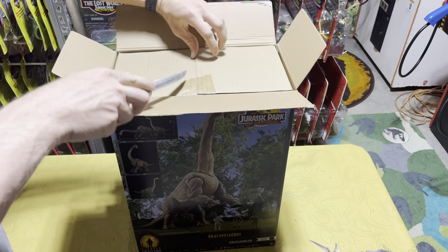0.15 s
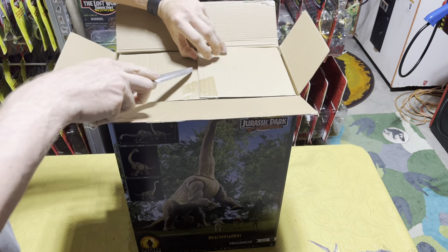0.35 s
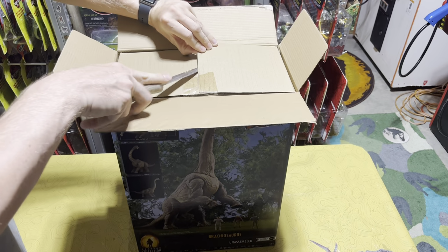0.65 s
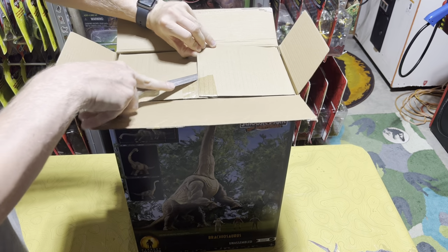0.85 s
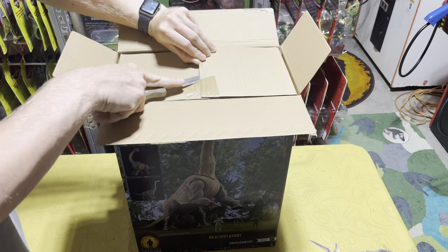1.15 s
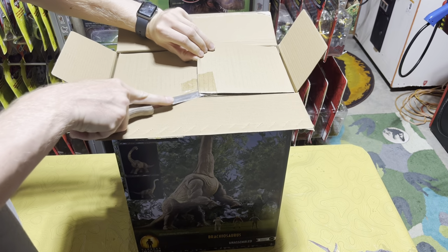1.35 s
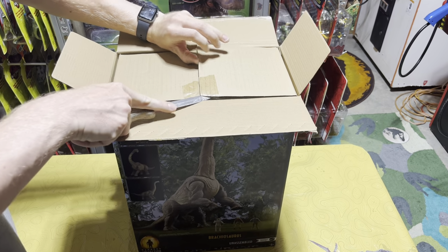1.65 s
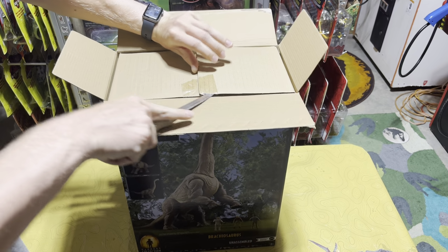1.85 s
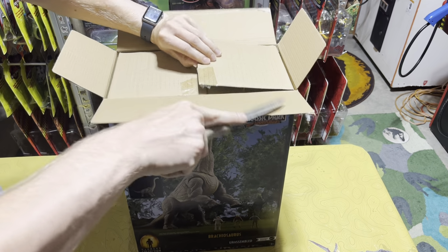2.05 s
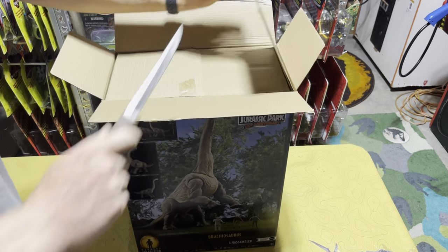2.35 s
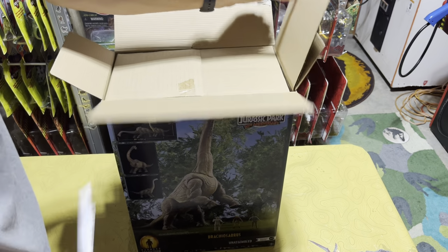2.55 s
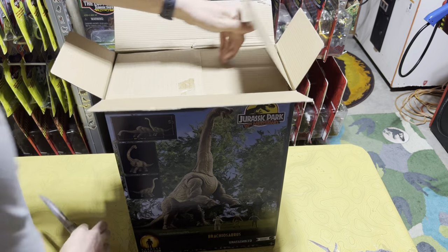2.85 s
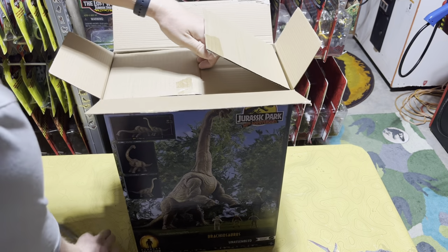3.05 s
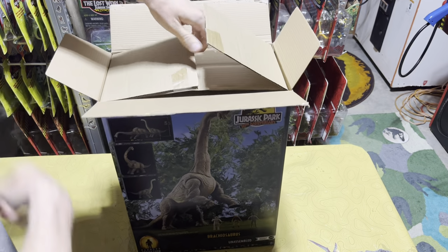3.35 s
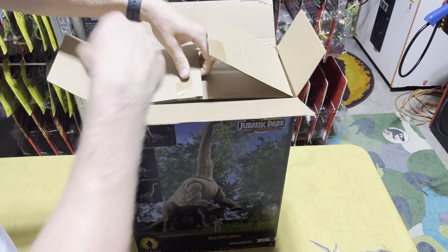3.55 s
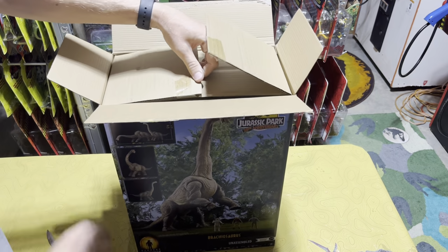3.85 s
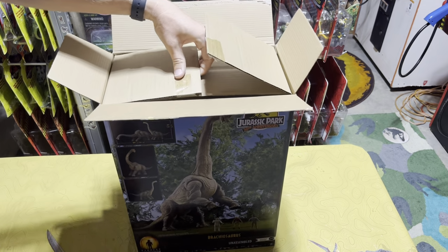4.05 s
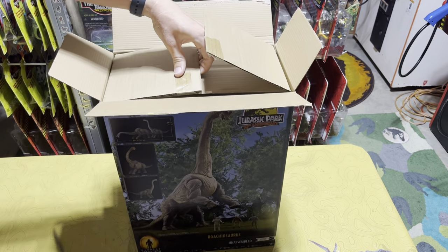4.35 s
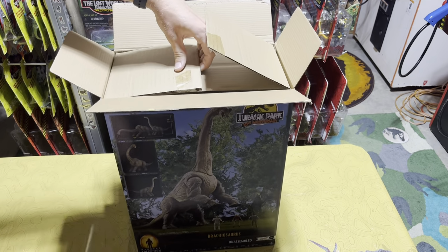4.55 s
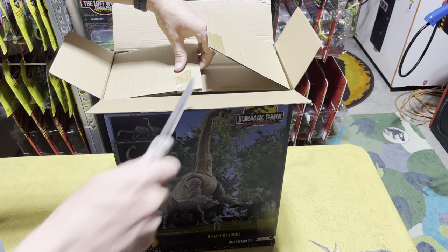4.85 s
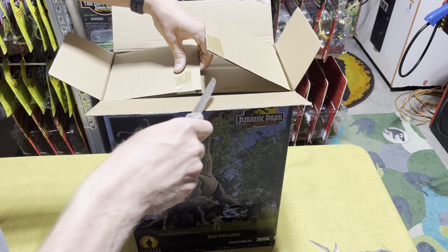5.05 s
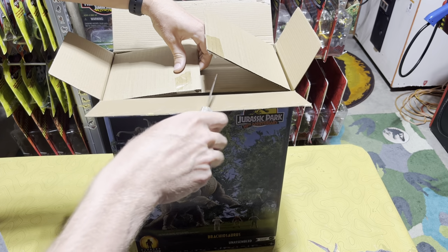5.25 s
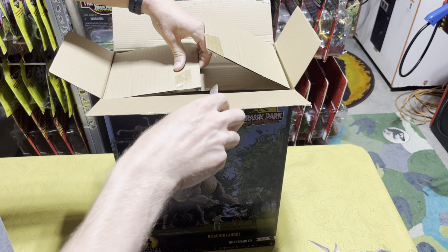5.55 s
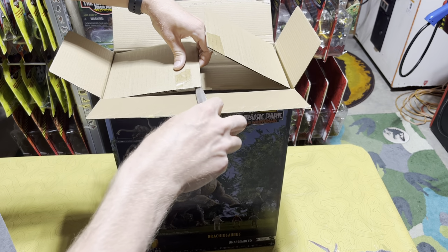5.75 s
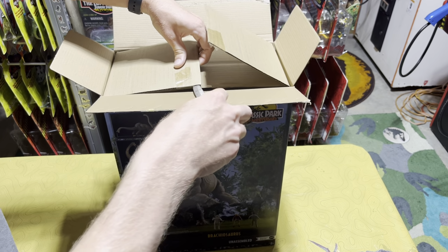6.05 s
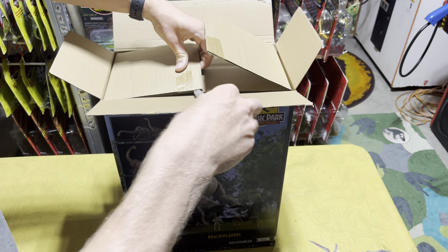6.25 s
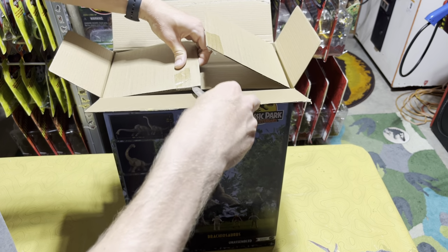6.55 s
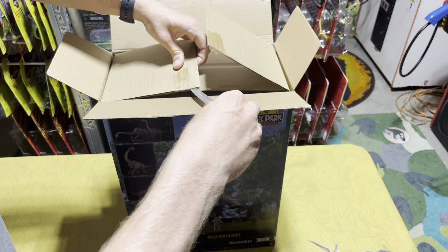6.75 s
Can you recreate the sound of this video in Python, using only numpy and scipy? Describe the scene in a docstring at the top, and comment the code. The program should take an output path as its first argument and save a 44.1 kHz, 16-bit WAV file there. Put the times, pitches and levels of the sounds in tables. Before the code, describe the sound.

A knife scrapes and saws at a cardboard box up close, flaps knock and boom hollowly, then one sharp bright click and quieter scratching.

```python
"""In a small, crowded room a cardboard box is opened on a cloth-covered table, close to two microphone ports.
Sliding hands and a blade are friction noise and scattered snaps; juddering, sawing and squealing
edges are stick-slip oscillators. Flaps knock as dispersed bending waves, the hollow box rings in damped
modes, and parting bonds, among them a sharply clicking inner flap, are short bursts of bright noise.
Diffuse echoes of the blows and faint still air lie behind them."""
import sys
import numpy as np
from scipy import signal
from scipy.fft import rfft, irfft, next_fast_len
from scipy.io import wavfile

SR = 44100
rng = np.random.default_rng(int(sys.argv[2]) if len(sys.argv) > 2 else 0)


def digitize_waveform(pressure):
    """Quantize a signal to 16-bit integers and store it at the path in sys.argv[1].

    Rows of a 2-D input are taken as channels; values are limited to [-1, 1].
    """
    field = np.atleast_2d(pressure).T
    bounded = np.clip(field, -1, 1)
    quanta = np.round(bounded * 32767).astype(np.int16)
    wavfile.write(sys.argv[1], SR, quanta)


N = 304290
TIME = np.arange(N) / SR
AGE = np.arange(SR // 4) / SR  # time since a blow, s
SIZE = next_fast_len(N + SR // 3)
BINS = np.maximum(np.fft.rfftfreq(SIZE, 1 / SR), 1)  # Hz
PORT_SIGNS = np.array([[1], [-1]])  # left, right
BAND_TOP_HZ = 0.45 * SR

# Still room: f/Hz, spectral shape/dB per Hz
AIR_SPECTRUM = [(15, -39.5), (30, 1.5), (65, 2), (140, -17), (500, -21.5), (900, -34.5), (6000, -47),
                (13500, -43.5), (15000, -61)]
# Reverberation: f/Hz, t60/s
ROOM_T60 = [(100, 0.25), (700, 0.087), (4000, 0.25), (13000, 0.094)]
# Likeness of the two ports: f/Hz, correlation
LIKENESS = [(60, 0.97), (250, 0.96), (700, 0.37), (2000, 0.93), (5000, 0.57), (12000, 0.93)]
# Level difference of the ports: f/Hz, left minus right level/dB
BALANCE = [(60, 1.5), (250, 1.5), (700, 4.5), (1100, 3), (2000, 0), (4400, 5), (9000, 0)]
# Diffraction round the recorder: f/Hz, lead of the left port/rad (negative: lag)
PORT_PHASE = [(100, 0), (600, 0.14), (950, 0.5), (1640, 0.91), (3270, 0.98), (5080, 0.9), (7000, -1.83),
              (11100, -5.5), (14500, -8.5)]

# Restless hands holding the box: t/s, level/dB ahead of the shares below
FIDGET = [(0.0, -61), (2.0, -68), (2.7, -73.5), (4.3, -69.5), (5.1, -83), (6.9, -76)]
FIDGET_FLEX_DB, FIDGET_DRUM_DB, FIDGET_RASP_DB, FIDGET_HISS_DB = -6.5, -1.5, -8.5, -5.5
# Palm brushing the board: start t/s, swell/s, fade/s, relative level/dB
SWIPES = [(0.74, 0.1, 0.14, -60), (1.635, 0.036, 0.54, -57.5), (2.02, 0.14, 0.13, -52),
          (2.19, 0.098, 0.068, -47.5), (2.356, 0.11, 0.22, -55), (2.686, 0.037, 0.11, -56.5),
          (3.0, 0.11, 0.091, -55.5), (4.25, 0.2, 0.41, -63.5), (5.225, 0.012, 0.011, -60),
          (5.602, 0.087, 0.016, -52), (6.268, 0.062, 0.046, -58)]
PALM_RASP_DB = -18.5  # soft skin hardly rasps
# Blade or flap edge dragged over the board: start t/s, swell/s, fade/s, relative level/dB,
# weight on the wall/dB, sharpness of the edge/dB
SCRAPES = [(0.231, 0.017, 0.067, -46.5, -29, -11), (0.318, 0.005, 0.2, -54.5, -3, -9),
           (0.458, 0.044, 0.1, -48.5, -9, -3.5), (0.547, 0.02, 0.035, -40, -26, 0),
           (0.588, 0.027, 0.055, -48, -6, -21), (0.651, 0.05, 0.05, -49.5, -4, 3.5),
           (0.844, 0.052, 0.12, -45, -19, 1), (0.958, 0.068, 0.022, -47, -19, -2),
           (1.061, 0.064, 0.061, -49.5, 0.5, -3.5), (1.15, 0.089, 0.072, -41.5, -4, 6),
           (1.256, 0.041, 0.023, -39, -3.5, -6.5), (1.326, 0.042, 0.032, -51, 1.5, 5.5),
           (1.649, 0.074, 0.08, -45.5, -5.5, -4.5), (1.768, 0.0099, 0.25, -49, -3, -3.5),
           (1.883, 0.053, 0.037, -29, -7, -4), (1.995, 0.024, 0.033, -40.5, -11, -3.5),
           (2.445, 0.063, 0.056, -44.5, 0.5, -2), (2.803, 0.01, 0.16, -40.5, -10, 0),
           (2.901, 0.061, 0.024, -41.5, -5, 2.5), (3.05, 0.2, 0.16, -52, 11.5, 1.5),
           (3.446, 0.041, 0.091, -40.5, 2, -0.5), (3.605, 0.016, 0.093, -70, 16, 23.5),
           (3.751, 0.028, 0.13, -46, -16, -6), (3.86, 0.028, 0.099, -51.5, -3.5, -3.5),
           (3.989, 0.016, 0.18, -55.5, -24, -3.5), (4.071, 0.04, 0.12, -65, -20, 10.5),
           (4.446, 0.016, 0.11, -59, -2.5, 3), (5.245, 0.042, 0.15, -57, -3, -6.5),
           (5.447, 0.0085, 0.83, -62, 3, -0.5), (5.556, 0.13, 0.034, -48.5, -9, -2.5),
           (5.757, 0.013, 0.0096, -48.5, -28, -5.5), (5.873, 0.046, 0.05, -53.5, -6, -11),
           (6.074, 0.069, 0.025, -46.5, -6.5, -5.5), (6.249, 0.051, 0.079, -53, 5.5, -4),
           (6.44, 0.041, 0.067, -65.5, 9, -12), (6.535, 0.061, 0.067, -52.5, 0.5, -8.5),
           (6.643, 0.063, 0.044, -39, 1.5, -1.5), (6.78, 0.015, 0.17, -45.5, -7.5, -8),
           (6.855, 0.29, .012, -48, -17.5, 12)]
# Treble of a scrape against its drumming; the hiss grows with the sharpness of the edge
RASP_DB, HISS_DB, HISS_PER_SHARPNESS = -5.5, -7, 1.3
# Every stroke bites, swells to its crest, fades by as much and dies away
BITE_S, SWELL_DB, RELEASE_DB_PER_S = 0.0092, 14, 261.5
# Colours of sliding contact, from flexing walls to surface hiss: f/Hz, spectral shape/dB per Hz
FLEX_SPECTRUM = [(18, -40.5), (40, -10), (60, 4), (140, 4.5), (200, -3.5), (280, -43)]
DRUM_SPECTRUM = [(130, -22), (210, 4), (320, 2), (430, -1.5), (640, -5.5), (880, -11.5), (1250, -37)]
RASP_SPECTRUM = [(620, -29.5), (950, 4), (1300, -8), (1800, -8.5), (2600, -11.5), (4800, -7.5), (6800, -24)]
HISS_SPECTRUM = [(3600, -6.5), (5200, -7), (7000, -1), (9500, -0.5), (12000, 0), (13800, -3), (14700, -13),
                 (16000, -33)]
# Resonances of the corrugated board: f/Hz, width/Hz, level/dB
BOARD = [(650.6, 38, -2), (990, 60, -2.5), (1410, 23, -2), (1860, 130, 3.5), (2250, 270, -3.5),
         (3070, 130, -10.5)]

# Edge juddering along the board: start t/s, end t/s, first f/Hz, last f/Hz, slips per s,
# relative level/dB, overtone level/dB, pitch scatter (share)
JUDDERS = [(0.0, 0.143, 375, 334.5, 280, -62, 5.5, 0.25), (0.237, 0.261, 382, 361, 180, -53, 4.5, 0.15),
           (2.932, 2.98, 266, 288, 125, -40.5, -8, 0.13),
           (4.074, 4.131, 364, 336.4, 165, -47.5, -0.5, 0.15),
           (5.233, 5.252, 337.5, 312, 330, -62, 9, 0.058),
           (5.273, 5.356, 321.4, 302, 260, -56.5, 0.5, 0.0885),
           (5.458, 5.519, 224, 219, 72, -51, -12.5, 0.023), (6.778, 6.793, 383, 343, 300, -54, 2.5, 0.085),
           (6.801, 6.833, 322, 288, 137, -46.5, -7, 0.064)]
# Modes of a juddering flap: multiple of the fundamental, level/dB, t60/s
FLAP_MODES = [(1, -2, 0.131), (3.03, -4.5, 0.13), (4.35, -19, 0.13), (5.55, -10.5, 0.095),
              (7.9, -17, 0.085), (11.6, -18, 0.036)]
# Blade sawing in the slit: start t/s, swell/s, fade/s, level/dB, pitch (multiple of the blade modes),
# unevenness of the slips (0-1)
SAWS = [(0.484, 0.029, 0.015, -48, 1.0, .15), (0.553, 0.019, 0.013, -46.5, 1.0, 0.31),
        (1.19, 0.078, 0.037, -47, 1.35, .4), (1.897, 0.043, 0.028, -37.5, 1.5, 0.32),
        (5.444, 0.0075, 0.048, -58.5, 1.0, 0.2), (5.5, 0.068, 0.075, -58.5, 1.0, .08),
        (5.63, 0.06, 0.031, -50.5, 1.0, .06), (6.088, 0.05, 0.0093, -58, 0.93, 0.12),
        (6.262, 0.074, 0.026, -62, 1.0, 0.2), (6.655, 0.063, 0.036, -49, 0.97, 0.08)]
# Blade gripped by the board, at pitch 1: f/Hz, width/Hz, level/dB
BLADE = [(680, 320, -1.5), (957, 200, -5.5), (1230, 78, -9), (1800, 250, -6), (2230, 200, -6.5),
         (3920, 440, -20)]
# Edge slipping in step with the panel: start t/s, end t/s, first f/Hz, last f/Hz, relative level/dB
SQUEAKS = [(0.43, 0.512, 542, 627, -48.5), (0.495, 0.594, 608.6, 477, -46), (2.855, 2.91, 618, 554, -38)]

# Stiff flaps springing back: t/s, relative level/dB
BOOMS = [(1.794, -36.5), (1.897, -38.5), (2.4594, -26.5), (2.4733, -25), (2.496, -25.5), (3.18, -31)]
# Modes of the hollow box: f/Hz, level/dB, t60/s
BOX_MODES = [(308.3, 2.5, 0.11), (320, -7.5, 0.08), (650, -17, 0.06), (990, -15.5, 0.079),
             (1600, -23.5, 0.07)]
# Blade tip pricking the tape: t/s, relative snap level/dB, clink of steel level/dB
TICKS = [(0.083, -42.5, -42.5), (0.2783, -43.5, -39.5), (0.319, -44.5, -36.5), (0.382, -42.5, -41),
         (0.401, -43, -42), (0.574, -38.5, -36), (1.03, -43.5, -48.5), (1.09, -46, -50),
         (1.157, -31.5, -24), (1.172, -33, -43), (1.217, -36, -31.5), (1.351, -37.5, -54),
         (1.4147, -39, -68), (1.64, -47, -50), (1.911, -30, -35), (1.941, -36.5, -30.5),
         (3.457, -52.5, -64), (3.5185, -29.5, -44), (4.4563, -45, -73), (5.7693, -68, -49.5),
         (6.6206, -46, -74), (6.7026, -35, -40)]
# Tape or a glued edge ripping free: t/s, level/dB
RIPS = [(2.134, -21.5), (2.495, -29), (3.051, -34), (3.2597, -12.5), (3.6326, -22.5), (6.7028, -27.5)]
RIP_T60_S, RIP_TAIL_DB, RIP_TAIL_T60_S = 0.014, -21.5, 0.086
# Flaps and blade striking or slipping off an edge: t/s, relative crack level/dB, clap level/dB,
# panel level/dB, panel f/Hz, thud level/dB, thud f/Hz
KNOCKS = [(0.414, -46, -57, -40.5, 398, -45, 204), (0.6654, -35.5, -36.5, -50, 330, -45, 195),
          (0.9147, -63, -45.5, -39, 450, -46.5, 93), (1.1136, -33.5, -37.5, -39.5, 284, -69, 148),
          (1.1559, -22, -47.5, -32.5, 407, -41.5, 143), (1.7904, -50, -36, -40, 367, -53.5, 101),
          (1.8914, -17.5, -19, -30.5, 381.5, -32.5, 140), (1.996, -34, -28.5, -42, 600, -49, 215),
          (2.1343, -27.5, -48.5, -44, 254, -38, 117), (2.455, -38, -30, -35.5, 293, -44, 204),
          (2.492, -31, -33, -42, 294, -29, 97), (2.8075, -56, -39, -34.5, 422, -58, 188),
          (2.8504, -43, -39, -29.5, 533, -63, 204), (2.905, -54.5, -48, -36.5, 414, -38, 194),
          (3.05, -50, -38, -40, 235, -39.5, 160), (3.1097, -44.5, -45, -34.5, 179.5, -38, 155),
          (3.1779, -29, -34.5, -25, 165, -19, 119), (3.2607, -16.5, -23, -27, 180, -27.5, 175),
          (3.2622, -24, -18, -38, 180, -37, 121.4), (3.6293, -31.5, -33, -32.5, 209.6, -49, 129),
          (3.75, -57, -65, -45.5, 530, -50, 142), (3.88, -42.5, -51.5, -41, 283, -58, 188),
          (4.074, -45, -69, -45.5, 570, -63, 86), (5.576, -46, -41, -43.5, 330, -43, 210),
          (6.7014, -29, -49, -38, 298, -37.5, 132), (6.798, -49.5, -47, -40, 640, -46, 213)]
FIBRE_DB = -6.5  # surface fibres crushed by a knock, against its crack
# The corrugation rings higher where the panel is stiffer
FLUTE_HZ, FLUTE_PANEL_HZ, FLUTE_FOLLOWS = 1060, 180, .3
# Bending-wave chirp: pitch is cycles over age, strength a bell round the panel's pitch
BEND_CYCLES, BEND_LEAD_S, BEND_OCTAVES = 2.286, 0.0007106, 0.84


def from_db(db):
    """Definition of level: an amplitude gain is the exponential of its decibels."""
    return np.exp(np.asarray(db) * (np.log(10) / 20))


def rms_one(x):
    """Normalisation: divide by the root of the mean power."""
    return x / np.sqrt(np.mean(x ** 2) + 1e-20)


def at_hz(points, hz):
    """Interpolation on a logarithmic frequency axis, the scale of pitch."""
    f, value = np.transpose(points)
    return np.interp(np.log(hz), np.log(f), value)


def band(x, low_hz, high_hz):
    """Causal band-pass filtering: only frequencies between two edges remain strong."""
    return signal.sosfilt(signal.butter(2, [low_hz, high_hz], "band", fs=SR, output="sos"), x)


def add(out, s, sound):
    """Superposition: a short signal adds in place to the mix from time s."""
    i = max(round(s * SR), 0)
    out[..., i:i + sound.shape[-1]] += sound[..., :N - i]


def drift(per_s):
    """Slow random modulation: normal values joined by straight lines, at unit rms."""
    knots = rng.standard_normal(N // 20)
    return rms_one(np.interp(TIME * per_s, np.arange(len(knots)), knots))


def correlated(mid, side, alike):
    """Partial coherence: a shared and an opposed part set the correlation of the ports."""
    return np.sqrt(1 + alike) * mid + np.sqrt(1 - alike) * side * PORT_SIGNS


def two_ports(pair, spectrum):
    """Diffuse-field coherence: two signals are coloured and correlated by frequency."""
    mid, side = rfft(pair, SIZE) * from_db(at_hz(spectrum, BINS))
    alike = np.clip(at_hz(LIKENESS, BINS), -1, 1)
    return irfft(correlated(mid, side, alike), SIZE)[:, :N]


def dying(t60, delay=0.0, rise=0.00031):
    """Damping of a blow: a quick rise, then an exponential fall of 60 dB per t60."""
    age = np.maximum(AGE - delay, 0)
    onset = 1 - np.exp(-np.minimum(age / rise, 20))
    return onset * from_db(np.maximum(-60 * age / t60, -200))


def ring(hz, t60, delay=0.0, rise=0.00075):
    """Damped harmonic oscillator: one mode sounds at its own frequency and decays."""
    return np.sin(2 * np.pi * hz * (AGE - delay)) * dying(t60, delay, rise)


def burst(low_hz, high_hz, envelope, apart):
    """High modal overlap: crowded, damped board modes merge into a band of noise."""
    mid, side = rms_one(band(rng.standard_normal((2, len(envelope))), low_hz, high_hz))
    sound = (mid + apart * side * PORT_SIGNS) * envelope
    return rms_one(sound) * np.sqrt(np.mean(envelope ** 2))


def bend(hz):
    """Dispersion: short bending waves cross the panel first, long ones last."""
    sweep_hz = BEND_CYCLES / (AGE + BEND_LEAD_S)
    bell = np.exp(-.5 * (np.log2(sweep_hz / hz) / BEND_OCTAVES) ** 2)
    return bell * np.sin(2 * np.pi * np.cumsum(sweep_hz) / SR)


def resonate(x, hz, width_hz):
    """Resonance: a two-pole filter whose gain is near 1 at its peak."""
    r = np.exp(-np.pi * width_hz / SR)
    poles = [1, -2 * r * np.cos(2 * np.pi * hz / SR), r * r]
    return signal.lfilter([1 - r, 0, r - 1], poles, x + 1e-18)  # tiny offset avoids denormals


def still_air():
    """Stationary random noise: the room's faint background has a fixed spectrum."""
    return from_db(-67.5) * rms_one(two_ports(rng.standard_normal((2, N)), AIR_SPECTRUM))


def room(x, wet_db, first_echo_s):
    """Reverberation: shelves and walls reflect diffusely, and each band decays at its own rate."""
    edges = np.geomspace(50, 13500, 9)
    tail = 0
    for low, high in zip(edges, edges[1:]):
        hz = np.sqrt(low * high)
        mid, side = band(rng.standard_normal((2, len(AGE))), low, high)
        alike = np.clip(at_hz(LIKENESS, hz), -1, 1)
        fall = dying(at_hz(ROOM_T60, hz), first_echo_s, rise=0.0014)
        gain = from_db(at_hz(wet_db, hz)) / np.sqrt(np.sum(fall ** 2))
        tail = tail + gain * fall * correlated(mid, side, alike)
    return irfft(rfft(x, SIZE) * rfft(tail, SIZE), SIZE)[:, :N]


def stroke(swell_s, fade_s):
    """Power follows speed: a stroke bites, gathers speed, slows and dies away."""
    age = np.arange(SR) / SR
    db = np.interp(age, [0, swell_s, swell_s + fade_s], [-SWELL_DB, 0, -SWELL_DB])
    released = np.maximum(age - swell_s - fade_s, 0)
    amplitude = np.clip(age / BITE_S, 0, 1) * from_db(db - RELEASE_DB_PER_S * released)
    return amplitude ** 2


def contact():
    """Incoherent addition: powers of all strokes add for flexing, drumming, rasp and hiss."""
    fidget = from_db(np.interp(TIME, *np.transpose(FIDGET)))
    fidget_shares = from_db([FIDGET_FLEX_DB, FIDGET_DRUM_DB, FIDGET_RASP_DB, FIDGET_HISS_DB])
    power = np.outer(fidget_shares, fidget) ** 2
    for start, swell_s, fade_s, db, weight_db, sharp_db in SCRAPES:
        hiss_db = HISS_DB + HISS_PER_SHARPNESS * sharp_db
        shares = from_db([weight_db, 0, RASP_DB + sharp_db, hiss_db])
        add(power, start, np.outer((from_db(db) * shares) ** 2, stroke(swell_s, fade_s)))
    for start, swell_s, fade_s, db in SWIPES:
        shares = np.array([0, 0, from_db(PALM_RASP_DB), 1])
        add(power, start, np.outer((from_db(db) * shares) ** 2, stroke(swell_s, fade_s)))
    return np.sqrt(power)


def friction(spectrum, catch_db, catches_per_s, grain_db):
    """Dry friction: fibres catch and let go in clumps, each a spray of uneven tiny snaps."""
    clumps_db = catch_db * np.clip(drift(catches_per_s), -2.5, 2.5)
    grains_db = grain_db * np.clip(drift(1500), -3, 3)
    noise = from_db(clumps_db + grains_db) * rng.standard_normal((2, N))
    return rms_one(two_ports(noise, spectrum))


def crunch(snaps_per_s=700, size_db=1.5, patchy_db=4.5, travel_per_s=25):
    """Impulsive excitation: crushed flutes ring board modes that come and go as contact travels."""
    at = np.flatnonzero(rng.random(N) < snaps_per_s / SR)
    sizes = from_db(size_db * np.minimum(rng.exponential(1, len(at)), 3.5))
    out = np.zeros((2, N))
    for hz, width, db in BOARD:
        strikes = np.zeros((2, N))
        strikes[:, at] = sizes * rng.uniform(-0.8, 1, (2, len(at)))
        patches_db = patchy_db * np.clip(drift(travel_per_s), -2, 2)
        out += from_db(db + patches_db) * resonate(strikes, hz, width)
    return rms_one(two_ports(out, [(300, -21), (620, 3), (4000, 7.0), (7000, -17.0)]))


def crackle(snaps_per_s=200, size_db=5.0, largest=2.2):
    """Brittle fracture: fibres and crumbs of glue break in separate snaps of uneven size."""
    sizes = from_db(size_db * np.minimum(rng.exponential(1, N), largest))
    snaps = sizes * (rng.random(N) < snaps_per_s / SR) * rng.choice([-1, 1], (2, N))
    return rms_one(two_ports(snaps, [(450, -18.5), (900, 3.5), (3200, -4), (7500, -13)]))


def catches(hops_per_s=130, size_db=3.5, pitches_hz=(520, 760, 1100, 1600)):
    """Impact on a corrugated surface: the edge hops, and each woody tap is a bending wave."""
    sizes = from_db(size_db * np.clip(rng.standard_normal(N), -2, 1.5))
    hops = sizes * (rng.random(N) < hops_per_s / SR)
    dealt = rng.integers(0, len(pitches_hz), N)  # which pitch each hop excites
    taps = sum(signal.oaconvolve(hops * (dealt == k), bend(hz))[:N] for k, hz in enumerate(pitches_hz))
    return rms_one(taps)


def rubbing():
    """Sliding contact: walls flex, panels drum, and the surface crunches, rasps and hisses."""
    flex, drum, rasp, hiss = contact()
    flexing = friction(FLEX_SPECTRUM, catch_db=2.0, catches_per_s=37, grain_db=4.0)
    drumming = friction(DRUM_SPECTRUM, catch_db=3.5, catches_per_s=39, grain_db=0.5)
    rasping = friction(RASP_SPECTRUM, catch_db=2.0, catches_per_s=78, grain_db=0)
    hissing = friction(HISS_SPECTRUM, catch_db=1.7, catches_per_s=69, grain_db=1.5)
    surface = (rasping * from_db(-7.0) + crunch() * from_db(-10.0)
               + crackle() * from_db(-7) + catches() * from_db(-4.5))
    return (flex * flexing * from_db(1.0) + drum * drumming * from_db(-2.5)
            + rasp * surface + hiss * hissing * from_db(-1.0))


def judders(uneven=0.39, rough_db=4.0, grit_db=-22.5):
    """Stick-slip: each slip grits and plucks the flap, whose pitch glides as its free length changes."""
    out = np.zeros(N)
    for start, end, first_hz, last_hz, slips_per_s, db, overtone_db, scatter in JUDDERS:
        chances = rng.standard_normal(size=(40, 2 + len(FLAP_MODES)))
        for slip, (late, strength, *detunes) in enumerate(chances):
            s = start + (slip + uneven * late * (slip > 0)) / slips_per_s
            if s >= end:
                continue
            hz = np.interp(s, [start, end], [first_hz, last_hz])
            pluck = 0
            for (multiple, mode_db, t60), detune in zip(FLAP_MODES, detunes):
                gain = from_db(mode_db + overtone_db * (multiple > 1))
                pluck = pluck + gain * ring(multiple * hz * (1 + scatter * detune), t60)
            grit = rms_one(band(rng.standard_normal(len(AGE)), 860, 3500)) * dying(0.0031)
            gain = from_db(db + rough_db * np.clip(strength, -1.5, 1.5))
            add(out, s, gain * (pluck + from_db(grit_db + overtone_db) * grit))
    return out


def saws(slips_per_s=240, size_db=4.0, apart=0.25, patchy_db=4.0, travel_per_s=28):
    """Stick-slip excitation: uneven slips ring blade modes that come and go as the grip moves."""
    grips = [from_db(patchy_db * np.clip(drift(travel_per_s), -2, 1.5)) for _ in BLADE]
    out = np.zeros((2, N))
    for start, swell_s, fade_s, db, pitch, uneven in SAWS:
        gaps = np.exp(uneven * rng.standard_normal(size=200))
        at = np.cumsum(gaps) * SR / (slips_per_s * pitch)  # slips quicken with pitch
        at = at[at < SR].astype(int)
        slips = np.zeros((2, SR))
        slips[:, at] = from_db(size_db * np.clip(rng.standard_normal((2, len(at))), -2, 2))
        rings = 0
        for (hz, width, mode_db), grip in zip(BLADE, grips):
            once = resonate(slips, pitch * hz, width)
            mode = rms_one(resonate(once, pitch * hz, width))
            rings = rings + from_db(mode_db) * np.interp(start + TIME[:SR], TIME, grip) * mode
        mid, side = rms_one(rings)
        envelope = from_db(db) * np.sqrt(stroke(swell_s, fade_s))
        add(out, start, envelope * (mid + apart * side * PORT_SIGNS))
    return out


def squeaks(creak_db=-21.0, tone_breaks_per_s=260, creak_breaks_per_s=500, creak_multiple=3.7):
    """Frictional self-oscillation: a broken, gliding tone with a rough creak nearly two octaves up."""
    tone = drift(tone_breaks_per_s) + 1j * drift(tone_breaks_per_s)
    creak = drift(creak_breaks_per_s) + 1j * drift(creak_breaks_per_s)
    out = np.zeros(N)
    for start, end, first_hz, last_hz, db in SQUEAKS:
        now = (TIME >= start) & (TIME < end)
        t = TIME[now]
        phase = 2 * np.pi * np.cumsum(np.interp(t, [start, end], [first_hz, last_hz])) / SR
        gate = np.clip(np.minimum(t - start, end - t) / BITE_S, 0, 1)
        hoarse = .5 * (1 + tone[now]) * np.exp(1j * phase)
        rough = from_db(creak_db) * creak[now] * np.exp(1j * creak_multiple * phase)
        out[now] += from_db(db) * gate * (hoarse + rough).real
    return out


def booms():
    """Modal ringing: a flap springs back and excites the hollow box."""
    out = np.zeros(N)
    for s, db in BOOMS:
        for hz, mode_db, t60 in BOX_MODES:
            add(out, s, from_db(db + mode_db) * ring(hz, t60, rise=0.00029))
    return out


def ticks():
    """Short impact, broad spectrum: the blade tip pricks tape with a tick, clink and tap of board."""
    out = np.zeros((2, N))
    for s, db, steel_db in TICKS:
        snap = from_db(db + 8.5) * burst(3500, BAND_TOP_HZ, dying(0.0037), apart=1.0)
        steel = from_db(steel_db) * burst(2300, 3400, dying(0.011), apart=0.44)
        tap = from_db(db - 3.5) * burst(650, 6600, dying(0.011), apart=0.44)
        add(out, s, snap + steel + tap)
    return out


def rips():
    """Sudden release of strain: the bond snaps brightly, then loosened fibres fizz and fade."""
    out = np.zeros((2, N))
    for s, db in RIPS:
        snap = burst(9300, BAND_TOP_HZ, dying(RIP_T60_S, rise=0.00011), apart=0.57)
        fizz = from_db(RIP_TAIL_DB) * burst(4500, 12000, dying(RIP_TAIL_T60_S, rise=0.0033), apart=0.31)
        add(out, s, from_db(db) * (snap + fizz))
    return out


def knocks(treble_apart=.45, middle_apart=.3):
    """Dispersion of a blow: treble travels fastest, so crack, clap, panel and thud follow in turn."""
    out = np.zeros((2, N))
    for s, crack_db, clap_db, panel_db, panel_hz, thud_db, thud_hz in KNOCKS:
        fibre_fall = dying(0.0098, rise=0.00094)
        fibres = from_db(crack_db + FIBRE_DB) * burst(11000, BAND_TOP_HZ, fibre_fall, treble_apart)
        crack = from_db(crack_db + 0.5) * burst(1500, 12000, dying(0.016, rise=0.0015), treble_apart)
        clap_fall = dying(0.024, delay=0.00061, rise=0.0024)
        clap = from_db(clap_db + 1.5) * burst(600, 2100, clap_fall, middle_apart)
        flute_hz = FLUTE_HZ * (panel_hz / FLUTE_PANEL_HZ) ** FLUTE_FOLLOWS
        flute = from_db(clap_db + 3.5) * ring(flute_hz, 0.019, delay=0.0024, rise=0.003)
        panel = from_db(panel_db + 2.0) * bend(panel_hz)
        flutter_fall = dying(0.059, delay=0.00098, rise=0.001)
        flutter = from_db(panel_db - 1.0) * burst(360, 747, flutter_fall, middle_apart)
        thud = from_db(thud_db + 9.0) * ring(thud_hz, 0.061, delay=0.008, rise=0.0044)
        add(out, s, fibres + crack + clap + flute + panel + flutter + thud)
    return out


def scene():
    """Superposition at two ports: air, echoes, sliding and blows, with the box facing the left port."""
    blows = knocks() + rips() + ticks() + booms()
    wet_db = [(100, -17.0), (400, -9.5), (1500, -9.5), (5000, -7.0), (12000, -20)]  # f/Hz, level/dB
    echoes = room(blows, wet_db, first_echo_s=0.0019)
    sliding = rubbing() + judders() + saws() + squeaks()
    sound = still_air() + echoes + sliding + blows
    half = .5 * PORT_SIGNS  # each port takes half of the difference
    ports = from_db(half * at_hz(BALANCE, BINS)) * np.exp(1j * half * at_hz(PORT_PHASE, BINS))
    return irfft(rfft(sound, SIZE) * ports, SIZE)[:, :N]


def record(dry):
    """Linear filtering: the microphone sheds deep bass, notches the treble and ends steeply on top."""
    bass = signal.butter(5, 40, "highpass", fs=SR, output="sos")
    notch = signal.butter(3, [7650, 9150], "bandstop", fs=SR, output="sos")
    port = signal.butter(14, 14700, fs=SR, output="sos")
    top = signal.ellip(10, .1, 80, 16000, fs=SR, output="sos")  # ripple and stop-band in dB, edge in Hz
    return signal.sosfilt(np.vstack([bass, notch, port, top]), dry)


dry = scene()
out = record(dry)
digitize_waveform(out)
```